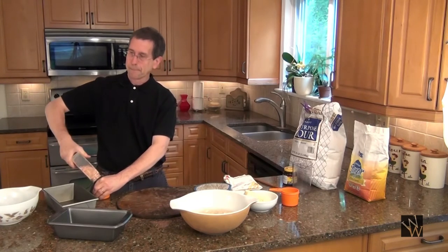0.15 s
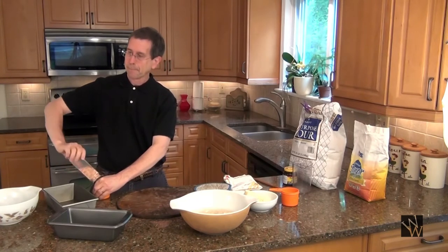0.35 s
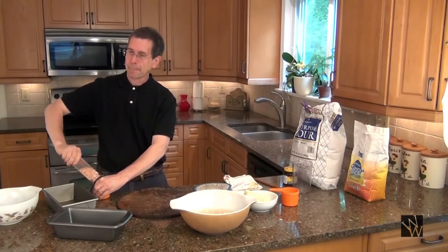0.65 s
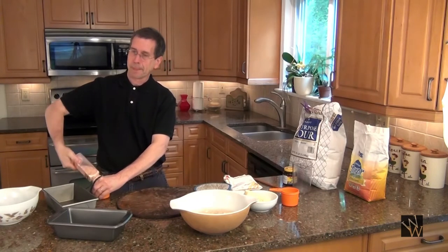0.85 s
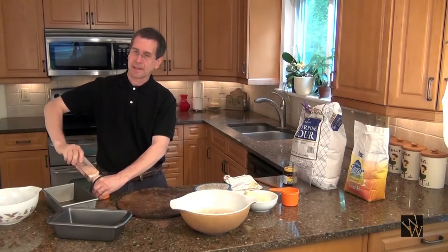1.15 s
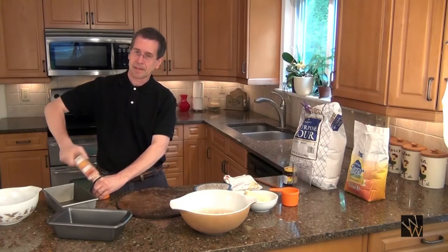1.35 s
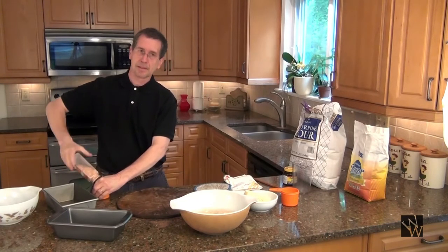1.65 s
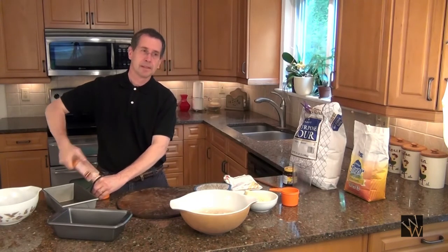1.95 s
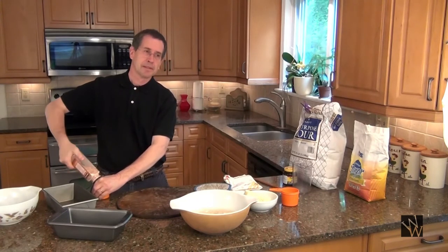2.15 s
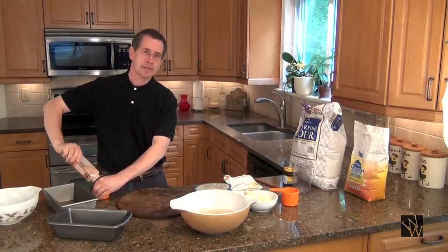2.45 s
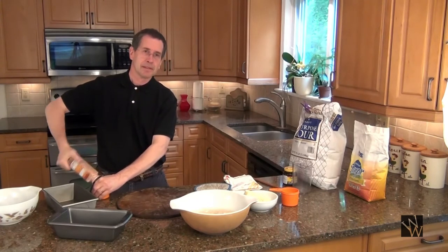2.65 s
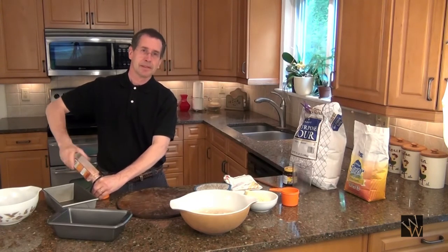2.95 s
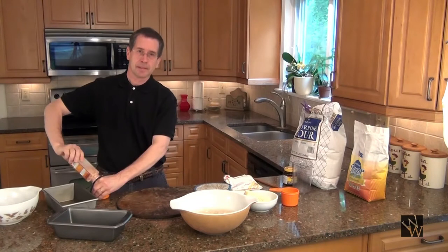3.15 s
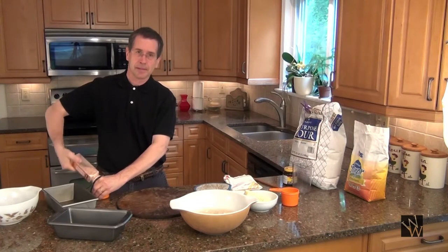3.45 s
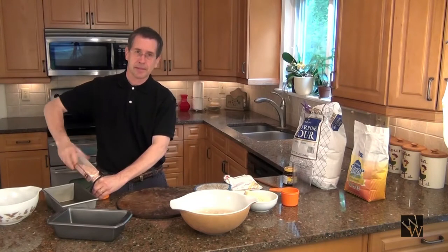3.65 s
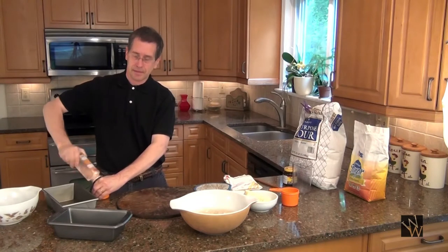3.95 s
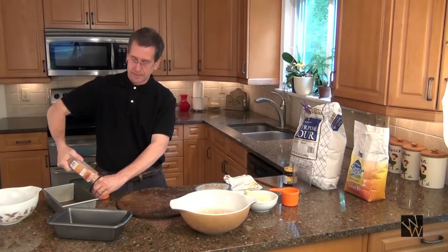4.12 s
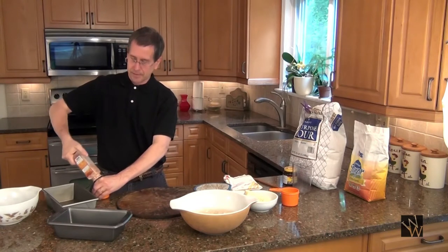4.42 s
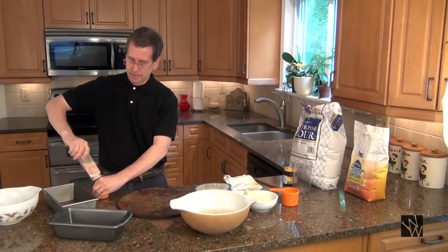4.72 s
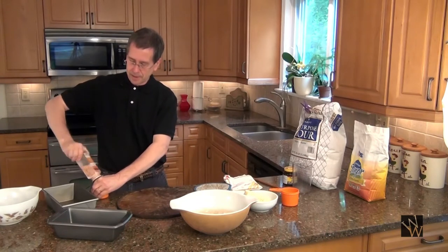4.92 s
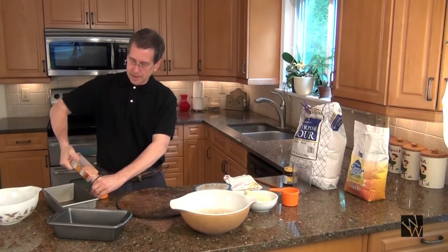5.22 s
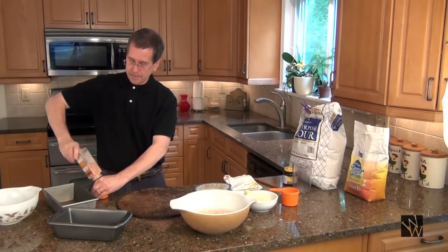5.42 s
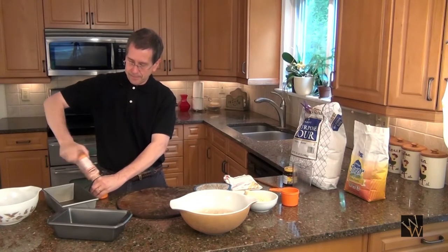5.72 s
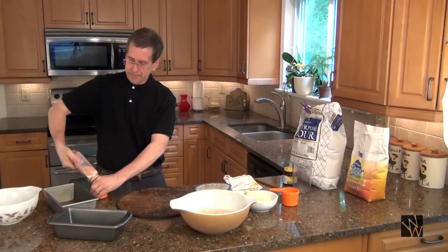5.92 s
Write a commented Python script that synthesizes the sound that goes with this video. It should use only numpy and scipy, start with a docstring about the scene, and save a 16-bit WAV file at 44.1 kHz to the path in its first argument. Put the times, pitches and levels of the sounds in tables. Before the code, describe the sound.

Close in a home kitchen, a hand-held salt mill is twisted in short, separate strokes. Each bites with a crunchy crack, then rasps finer and brighter for about a fifth of a second. Crystals tick and salt sifts in the gaps. Early twists are spaced apart; later ones grow denser and more irregular, with small squeaks, dull hand bumps and faint low rumble.

```python
"""A salt mill is twisted by hand in short rasping strokes: random fractures excite snap, rasp, body and crunch.
Strokes crunch coarsely first, then rasp finer and ring the body; salt sifts throughout.
Single crystals crack as decaying noise clicks, loose grains tick at random, narrow noise bands squeak briefly.
Hands rub as dull noise and bump as short sines; reflections of random sign form a brief kitchen tail.
Low rumble and a steady noise floor lie behind; a peak limiter flattens the loudest moments."""
import sys
import numpy as np
from scipy import signal
from scipy.fft import rfft, irfft
from scipy.io import wavfile
from scipy.ndimage import uniform_filter1d, minimum_filter1d

SR = 44100
rng = np.random.default_rng(int(sys.argv[2]) if len(sys.argv) > 2 else 0)


def log_audio(samples):
    """Write samples as a 16-bit WAV file to the path given in sys.argv[1]."""
    # one column per channel
    frames = np.atleast_2d(samples).T
    # limit to full scale, then quantise
    limited = np.clip(frames, -1, 1)
    pcm = np.round(limited * 32767).astype(np.int16)
    wavfile.write(sys.argv[1], SR, pcm)


N = 268128

# Snap pitch of the crystals: t/s, f/Hz (before random spread)
SNAP_PITCH = [(0, 9900), (.2, 11400), (.55, 11000), (.72, 10450), (1.3, 10000), (1.8, 10660), (3.45, 10550),
              (3.75, 10400), (3.98, 10400), (4.1, 11400), (4.3, 9300), (4.45, 11900), (4.8, 11800),
              (4.92, 10800), (5.45, 10300), (5.78, 10500), (6.08, 10200)]
# Snap colour: f/Hz, relative level/dB
SNAP_COLOUR = [(3000, -14), (6500, -12), (7600, -4.5), (8400, 0.5), (9200, -0.5), (10500, -1.5),
               (11700, -2), (13000, -1.5), (14500, -3), (16000, -12.5)]
# Body resonance colour: f/Hz, relative level/dB
BODY_COLOUR = [(500, -35), (1400, -14.5), (1680, -11), (1930, -3.5), (2150, -7.5), (2380, -11),
               (2800, -15.5), (8000, -39)]
# Rasp colour: f/Hz, relative level/dB
RASP_COLOUR = [(300, -32.5), (900, -14.5), (1500, -4), (2300, -3), (2900, -1.5), (4500, 0), (6300, 1.5),
               (7500, 2), (9000, -10), (11000, -13), (16000, -54)]
# Burr resonances: f/Hz, width/Hz, level over rasp colour/dB
BURR_MODES = [(3570, 830, -7), (4840, 320, -21), (5450, 1200, -8.5)]
# Coarse crunch colour: f/Hz, relative level/dB
CRUNCH_COLOUR = [(40, -38), (120, -4), (300, -6), (480, -3.5), (750, 4.5), (1000, 3), (1350, 2.5),
                 (1900, 0.5), (3500, -5.5), (9000, -26)]


def grinding(snap_db=0.0, rasp_db=0.0, body_db=4.0, crunch_db=2.0, crowding=0.29, sliding=1.0,
             snap_width_hz=2500, snap_spread=0.015, body_width_hz=800, body_spread=0.12, uneven_db=1.52):
    """The same fractures snap, rasp on the burrs, ring the body and, while coarse, crunch."""
    snap, rasp, body, crunch = np.hypot(turning(), sifting())
    # salt packs unevenly: ring and crunch come and go
    body = body * gain_of(uneven_db * wander(samples=900))
    crunch = crunch * gain_of(uneven_db * wander(samples=900))
    # harder turning breaks more crystals per second
    effort = (snap / snap.max()) ** crowding
    force = fractures(per_s=1900 * effort, spread_db=2.0, crumble_s=0.0008)
    coarse = fractures(per_s=280 * effort, spread_db=5.0, crumble_s=0.0062)

    pitch_hz = np.interp(np.arange(N) / SR, *np.transpose(SNAP_PITCH))
    snap_hz = pitch_hz * (1 + snap_spread * wander(samples=70))
    snap_clicks = splinters(force + 0.36 * coarse, patchy_db=-1.7)
    snaps = resonate(ring(snap_clicks, SNAP_COLOUR), snap_hz, snap_width_hz)

    # sliding powder adds an even rub
    rub = force + 0.78 * coarse + sliding * effort
    # body pitch shifts as the salt moves inside
    body_hz = 1980 * (1 + body_spread * wander(samples=500))
    rings = resonate(ring(splinters(rub, patchy_db=4.0), BODY_COLOUR), body_hz, body_width_hz)
    rasps = ring(rasp * splinters(rub, patchy_db=2.2), RASP_COLOUR, BURR_MODES)
    crunch_clicks = splinters(coarse + 0.5 * force, patchy_db=-1.5)
    crunches = ring(crunch * crunch_clicks, CRUNCH_COLOUR)

    out = gain_of(snap_db) * snap * snaps + gain_of(body_db) * body * rings
    return out + gain_of(rasp_db) * rasps + gain_of(crunch_db) * crunches


# Mill twists: start t/s, length/s, time to bite/s, snap level/dB, rasp level/dB, body level/dB,
# coarse crunch level/dB (levels before envelopes and layer gains)
TWIST_STROKES = [(-0.03, 0.034, .01, -18.5, -25, -39, -47), (0.235, 0.026, 0.026, -22.5, -31, -49.5, -48),
                 (0.673, 0.22, 0.037, -15, -24.5, -31, -31), (1.127, 0.02, 0.031, -19.5, -28, -48, -43),
                 (1.247, .025, 0.017, -21, -34.5, -56, -37.5), (1.298, 0.21, 0.005, -14, -22.5, -31, -32),
                 (1.864, 0.22, 0.055, -14, -22.5, -34, -32), (2.264, 0.08, 0.026, -27, -34, -65, -51.5),
                 (2.49, 0.045, 0.015, -27.5, -40.5, -69, -44), (2.568, .21, 0.012, -15, -22, -32.5, -33.5),
                 (3.207, 0.04, 0.027, -13.5, -24.5, -56, -34), (3.269, .225, 0.049, -15, -21, -34, -30.5),
                 (3.728, 0.033, 0.033, -17, -25.5, -48, -40.5), (3.887, 0.015, .005, -26, -39, -53, -38.5),
                 (3.925, 0.092, 0.01, -17.5, -25.5, -36.5, -38.5),
                 (4.014, 0.13, 0.06, -17.5, -19, -32.5, -44.5),
                 (4.523, 0.23, 0.063, -31, -31.5, -51, -45.5), (4.888, 0.13, 0.012, -25, -26.5, -44, -40.5),
                 (4.993, 0.15, 0.0037, -16, -19.5, -28.5, -33), (5.2, 0.017, 0.0088, -28, -29, -35.5, -60),
                 (5.401, 0.12, 0.033, -16, -20.5, -55, -42.5), (5.637, 0.043, 0.016, -17, -23.5, -54, -36),
                 (5.687, 0.21, 0.013, -15, -19, -30, -31.5)]


def turning(snap_fall_db_per_s=230, rasp_fall_db_per_s=190, body_fall_db_per_s=150,
            crunch_fall_db_per_s=210, rasp_growth_db_per_s=32, body_growth_db_per_s=55,
            fining_db_per_s=70, coarse_s=0.067):
    """Gains of snap, rasp, body, crunch: as salt grinds finer, crunch fades while rasp and ring grow."""
    gains = np.zeros((4, N))
    for start, length, bite, snap, rasp, body, crunch in TWIST_STROKES:
        age = np.clip(np.arange(N) / SR - start, 0, length)
        remaining = length - age
        fine_s = np.maximum(age - coarse_s, 0)
        levels_db = [
            snap + twist(start, length, bite, snap_fall_db_per_s),
            rasp + twist(start, length, bite, rasp_fall_db_per_s) - rasp_growth_db_per_s * remaining,
            body + twist(start, length, bite, body_fall_db_per_s) - body_growth_db_per_s * remaining,
            crunch + twist(start, length, bite, crunch_fall_db_per_s) - fining_db_per_s * fine_s]
        now = slice(max(int(start * SR), 0), int((start + length + 0.5) * SR))
        gains[:, now] = np.maximum(gains[:, now], gain_of([level[now] for level in levels_db]))
    return gains


def twist(start, length, bite, fall_db_per_s, bite_db=17, silent_db=-200):
    """Relative level of one twist in dB: swells as the burrs bite, holds, dies when the hand stops."""
    t = np.arange(N) / SR - start
    swell_db = bite_db * np.minimum(t / max(bite, 1e-3) - 1, 0)
    return np.where(t < 0, silent_db, swell_db - fall_db_per_s * np.maximum(t - length, 0))


# Salt sifting between the burrs: t/s, level/dB (before layer gains)
SIFTING_LEVEL = [(0, -47.5), (.35, -51), (.52, -62), (.66, -46), (0.98, -37), (1.11, -45), (1.24, -45),
                 (1.72, -39.5), (1.82, -45.5), (2.2, -39.5), (2.46, -49), (2.92, -43), (3.05, -39),
                 (3.17, -50.5), (3.58, -33.5), (3.7, -44.5), (4.25, -37.5), (4.42, -50.5), (4.65, -32.5),
                 (5.28, -40), (5.38, -52), (5.6, -41.5), (6.08, -53)]


def sifting(snap_db=3.0, rasp_db=-2.0, body_db=-19.0, crunch_db=-15.5):
    """Gains of snap, rasp, body and crunch for salt that only sifts."""
    return gain_of([[snap_db], [rasp_db], [body_db], [crunch_db]]) * follow(SIFTING_LEVEL)[0]


def fractures(per_s, spread_db, crumble_s):
    """Force of crystals giving way at random: many small, few large, each decaying briefly."""
    sizes = gain_of(spread_db * np.minimum(rng.exponential(1, N), 3.5))
    breaks = sizes * (rng.random(N) < per_s / SR)
    # powers add; amplitude decays by 1/e in crumble_s
    return np.sqrt(signal.lfilter([1], [1, -np.exp(-2 / (crumble_s * SR))], breaks ** 2))


def splinters(force, patchy_db):
    """Tiny random clicks under a force of drifting strength, steadied in power."""
    patchy = gain_of(patchy_db * wander(samples=45))
    return steadied(force * patchy * rng.standard_normal(N))


# Single crystal cracks: t/s, tick level/dB, tick f/Hz, rasp level/dB, crunch level/dB
# (rms over 3 ms, before layer gains)
CRYSTAL_CRACKS = [(0.1319, -17, 11600, -49, -58), (0.3017, -23, 11800, -45, -45),
                  (0.381, -27, 11900, -47, -72), (0.4203, -25, 11200, -53, -72),
                  (0.4558, -31, 11500, -54, -72), (0.4657, -27.5, 11600, -53, -72),
                  (0.577, -31.5, 11700, -41, -59), (0.6176, -24.5, 11000, -37, -68),
                  (0.6828, -17, 11000, -26, -41), (0.9765, -24, 10400, -18.5, -50),
                  (1.024, -23, 10500, -22.5, -43), (1.088, -21.5, 10900, -39, -64),
                  (1.1994, -30, 10300, -30, -48), (1.3056, -8, 9900, -20, -34),
                  (1.3177, -18, 10700, -17, -17.5), (1.55, -28, 10500, -12.5, -40),
                  (1.59, -17.5, 10400, -19.5, -49.5), (1.6674, -26, 11400, -26, -57),
                  (1.727, -31, 10800, -40, -41), (1.771, -30, 10800, -31, -38),
                  (1.8383, -19, 10700, -51, -45), (1.8514, -8.5, 10700, -23, -44),
                  (1.883, -21, 10700, -22, -31.5), (2.305, -22, 11600, -30.5, -51),
                  (2.5032, -32, 11000, -42, -62), (2.5792, -7, 10900, -9.5, -14),
                  (2.9014, -27, 10500, -46, -66), (2.9629, -37, 10000, -32, -41),
                  (3.023, -25, 10500, -50, -60), (3.221, -10, 11100, -40, -35),
                  (3.5395, -14, 11100, -7.5, -53), (3.7316, -16, 11660, -40, -46),
                  (3.851, -26, 11600, -48, -51), (3.889, -16.5, 11800, -45, -28),
                  (3.899, -21, 11700, -44, -52), (3.91, -16, 12500, -42, -55),
                  (3.9368, -18, 12000, -27, -28), (4.041, -6, 12500, -29, -39),
                  (4.2767, -14, 11400, -36, -67), (4.3769, -35, 12700, -34.5, -38),
                  (4.4044, -31, 13900, -39, -64), (4.4256, -27, 12800, -43, -63),
                  (4.4348, -23, 12700, -46, -63), (4.4571, -18, 12100, -55, -56),
                  (4.474, -22, 12200, -54, -69), (4.5973, -22, 12200, -18, -61),
                  (4.612, -17, 12900, -27, -43), (4.6515, -16, 12200, -16, -42),
                  (4.6688, -19, 12000, -11.5, -30), (4.6875, -11, 12300, -11.5, -37),
                  (4.7196, -15, 12400, -12.5, -49), (4.7472, -27, 12600, -13, -51),
                  (4.7937, -28, 11800, -19, -54), (4.8107, -17, 12700, -21, -54),
                  (4.816, -25, 12400, -19, -51), (4.8227, -26, 11800, -18, -49),
                  (4.855, -21.5, 11300, -20.5, -58), (4.8872, -16.5, 10000, -12.5, -31),
                  (4.9004, -13, 10100, -8, -24.5), (4.9741, -23, 10500, -8.5, -30),
                  (5.0011, -12.5, 10500, -26.5, -16), (5.2194, -14.5, 10300, -13.5, -44),
                  (5.2796, -15, 11000, -25.5, -41), (5.291, -14.5, 10800, -38, -66),
                  (5.4039, -20.5, 10500, -23, -52), (5.6489, -11, 10500, -31, -28.5)]
# Tick colour: f/Hz, relative level/dB
TICK_COLOUR = [(3000, -14.5), (7000, -10), (9000, 5), (11000, 2.5), (12200, 3.5), (13500, 7), (16000, 2.5)]
# Large crystal bursting, colour: f/Hz, relative level/dB
BURST_COLOUR = [(40, -6), (130, 1), (400, 5), (800, 0), (1150, 7.5), (1600, -17), (2200, -6.5),
                (3200, -4.5), (9000, -35)]


def cracks(tick_db=0.0, rasp_db=-5.5, crunch_db=0.0, split_s=0.00041, crumble_s=0.0024,
           crumble_share=0.6, crush_s=0.0039, width_hz=2500, peak_db=19.0):
    """Crystals split and crumble, ticking at their own pitch and knocking the mill; pieces crush longer."""
    t, out = np.arange(500) / SR, np.zeros(N)
    window = 0.003 * SR
    noises = rng.standard_normal((len(CRYSTAL_CRACKS), len(t)))
    for (s, tick, hz, rasp, crunch), noise in zip(CRYSTAL_CRACKS, noises):
        split, crumble, crush = (noise * np.exp(-t / fade) for fade in (split_s, crumble_s, crush_s))
        parts = (ring(split + crumble_share * crumble, TICK_COLOUR, [(hz, width_hz, peak_db)]),
                 ring(crumble, RASP_COLOUR, BURR_MODES),
                 ring(crush, BURST_COLOUR))
        for part, db in zip(parts, (tick + tick_db, rasp + rasp_db, crunch + crunch_db)):
            add(out, s, gain_of(db) * part * np.sqrt(window / np.sum(part ** 2)))
    return out


def loose_grains(tick_db=-11.5, rasp_db=-17.5, crunch_db=-21.5, ground_db=-3.0):
    """Single grains tick at random: faintly while salt sifts, harder while the burrs turn."""
    drops = evened(fractures(per_s=45, spread_db=4.0, crumble_s=0.00097) * rng.standard_normal(N))
    drops = drops * (follow(SIFTING_LEVEL)[0] + gain_of(ground_db) * turning()[1])
    ticks = gain_of(tick_db) * ring(drops, TICK_COLOUR, [(11300, 5300, 26)])
    rasps = gain_of(rasp_db) * ring(drops, RASP_COLOUR, BURR_MODES)
    return ticks + rasps + gain_of(crunch_db) * ring(drops, BURST_COLOUR)


# Crystals sticking and slipping on the burrs: middle t/s, length/s, f/Hz, width/Hz,
# level/dB (rms before the Hann fade)
STICK_SLIPS = [(0.884, 0.12, 5380, 300, -27), (2.717, 0.053, 4210, 300, -23.5),
               (4.142, 0.16, 5400, 330, -28.5), (4.5, 0.11, 4400, 250, -64), (4.954, .08, 4050, 350, -30),
               (4.987, 0.16, 4630, 450, -24), (5.825, 0.03, 5420, 300, -20), (5.92, 0.03, 3700, 350, -27)]


def squeaks():
    """Uneven slips, as narrowband noise, pump one resonance for a moment."""
    out = np.zeros(N)
    for s, length, hz, width, db in STICK_SLIPS:
        t = np.arange(0, length, 1 / SR)
        lowpass = signal.butter(2, width / 2, fs=SR)
        slips = signal.lfilter(*lowpass, rng.standard_normal((2, SR)))[:, -len(t):]
        tone = evened(((slips[0] + 1j * slips[1]) * np.exp(2j * np.pi * hz * t)).real)
        add(out, s - length / 2, gain_of(db) * np.hanning(len(t)) * tone)
    return out


# Hands rubbing on the mill: t/s, level/dB
RUBBING_LEVEL = [(.1, -71), (.32, -53), (.6, -53.5), (1.15, -50), (1.6, -57), (2.45, -72), (3.1, -52),
                 (4.25, -52), (4.62, -39), (4.79, -61), (4.93, -30), (5.0, -44), (5.35, -56), (6.08, -62)]
# Grip colour: f/Hz, relative level/dB
GRIP_COLOUR = [(30, -15.5), (60, 6), (100, -0.5), (160, -3), (230, -3), (310, 0), (390, -11), (700, -22.5),
               (2000, -23.5)]
# Soft hand bumps: t/s, peak level/dB, f/Hz, length/s
HAND_BUMPS = [(0.495, -32.5, 157, 0.048), (1.682, -39, 263, 0.0087), (2.505, -37, 192, 0.016),
              (3.681, -29, 230, 0.008), (4.385, -37.5, 293, 0.031), (4.914, -24, 308, 0.038),
              (4.952, -29, 320, 0.03)]


def hands(rub_db=0.0, push_db=-4.5):
    """Grip rubs as dull noise, louder at each push; soft bumps are Hann-shaped sines."""
    push = pushing(rise_s=0.0033, ease_db_per_s=130, release_db_per_s=150)
    level = np.hypot(gain_of(rub_db) * follow(RUBBING_LEVEL)[0], gain_of(push_db) * push)
    out = ring(level * rng.standard_normal(N), GRIP_COLOUR)
    for s, db, hz, length in HAND_BUMPS:
        t = np.arange(0, length, 1 / SR)
        add(out, s, gain_of(db) * np.hanning(len(t)) * np.sin(2 * np.pi * hz * t))
    return out


def pushing(rise_s, ease_db_per_s, release_db_per_s):
    """Push of the hands: hardest as a twist breaks into coarse crystals, then easing."""
    t, out = np.arange(SR // 2) / SR, np.zeros(N)
    for start, length, bite, *_, crunch in TWIST_STROKES:
        ease_db = ease_db_per_s * np.maximum(t - bite, 0)
        release_db = release_db_per_s * np.maximum(t - length, 0)
        rise = np.minimum(t / (bite + rise_s), 1)
        add(out, start, rise * gain_of(crunch - ease_db - release_db))
    return out


# Kitchen decay: f/Hz, t60/s
KITCHEN_DECAY = [(250, 0.14), (660, 0.49), (1800, 0.12), (4600, 0.34), (10000, 0.39), (16000, 0.35)]


def kitchen(x, spacing=20):
    """Room tail: sparse reflections of random sign, each band dying at its own speed."""
    taps = np.zeros(SR)
    at = np.arange(200, SR - spacing, spacing)
    taps[at + rng.integers(0, spacing, len(at))] = rng.choice([-1., 1.], len(at))
    hz, t, z = signal.stft(taps, SR, nperseg=256)
    decay = gain_of(-60 * t / read(KITCHEN_DECAY, hz)[:, None])
    tail = signal.istft(z * decay, SR, nperseg=256)[1]
    return signal.fftconvolve(x, tail / np.linalg.norm(tail))[:N]


# Low rumble swells: middle t/s, level/dB (before swell gain)
RUMBLE_SWELLS = [(.37, -35.5), (1.2, -38), (2.388, -41), (3.8, -53), (4.0, -31.5), (4.31, -36), (4.94, -32)]
# Room floor colour: f/Hz, relative level/dB
FLOOR_COLOUR = [(10, -13), (25, -2), (37, -1.5), (55, -11), (90, -15), (200, -28), (400, -54), (1000, -34),
                (4000, -39), (16000, -35)]


def background(rest_db=-58.5, push_db=-7.5, swell_db=-1.5, swell_s=0.18, floor_db=-47):
    """Low rumble noise rises with each push and swells now and then, over a steady noise floor."""
    push = pushing(rise_s=0.02, ease_db_per_s=43, release_db_per_s=200)
    level = gain_of(rest_db) + gain_of(push_db) * push
    for s, db in RUMBLE_SWELLS:
        add(level, s - swell_s / 2, gain_of(db + swell_db) * np.hanning(int(swell_s * SR)))
    # f/Hz, relative level/dB
    rumble_colour = [(8, -42), (24, 4.0), (37, 20.5), (52, -9), (80, -13), (200, -63), (1000, -90)]
    return level * wash(rumble_colour) + gain_of(floor_db) * wash(FLOOR_COLOUR)


def wash(colour):
    """Steady noise of a given colour, rms 1."""
    spectrum = rfft(rng.standard_normal(N))
    return evened(irfft(spectrum * gain_of(read(colour, np.fft.rfftfreq(N, 1 / SR))), N))


def ring(x, colour, modes=(), size=4096):
    """Causal minimum-phase filter of unit energy: a broad colour with resonances standing on it."""
    hz = abs(np.fft.fftfreq(size, 1 / SR))
    peaks = sum(gain_of(db) / (1 + (2 * (hz - f) / width) ** 2) for f, width, db in modes)
    log_gain = np.log(gain_of(read(colour, hz)) * (1 + peaks))
    response = np.fft.ifft(np.exp(np.conj(signal.hilbert(log_gain)))).real[:size // 2]
    return signal.oaconvolve(x, response / np.linalg.norm(response))[:N]


def resonate(x, hz, width_hz):
    """A resonance that follows the curve hz; the result has rms 1."""
    turn = np.exp(2j * np.pi * np.cumsum(hz) / SR)
    r = np.exp(-np.pi * width_hz / SR)
    return evened((turn * signal.lfilter([1 - r], [1, -r], x / turn)).real)


def wander(samples):
    """Random drift of rms 1: noise averaged twice over a sample window."""
    return evened(uniform_filter1d(uniform_filter1d(rng.standard_normal(N), samples), samples))


def steadied(x, samples=700):
    """Holds the power of a click train near 1, leaving its grain."""
    return x / np.sqrt(abs(uniform_filter1d(x ** 2, samples)) + 1e-6)


def evened(x):
    """Scales to rms 1."""
    return x / np.sqrt(np.mean(x ** 2) + 1e-20)


def gain_of(db):
    """Decibels to an amplitude factor."""
    return 10 ** (np.asarray(db) / 20)


def read(points, hz):
    """Reads a table on a log-frequency axis."""
    f, value = np.transpose(points)
    return np.interp(np.log(hz + 1), np.log(f + 1), value)


def follow(rows):
    """Each dB column of a curve as a gain for every sample."""
    s, *columns = np.transpose(rows)
    return [gain_of(np.interp(np.arange(N) / SR, s, c)) for c in columns]


def add(mix, s, sound):
    """Mixes a sound in at time s, or at 0 if s is negative."""
    part = mix[max(round(s * SR), 0):][:len(sound)]
    part += sound[:len(part)]


def scene(room_db=-7.0, count=6, changes_per_s=24):
    """Mill and hands in the kitchen; each break radiates its own way, so the reflections keep changing."""
    mill = grinding() + cracks() + loose_grains() + squeaks() + hands()
    # crossfade cyclically through several random tails
    place = np.arange(N) / SR * changes_per_s
    room = np.zeros(N)
    for k in range(count):
        distance = np.minimum(abs((place - k + 1) % count - 1), 1)
        room += kitchen(mill * np.cos(np.pi / 2 * distance))
    return (mill + gain_of(room_db) * room + background())[None]


def record(dry, ceiling_db=-1.8, recovery_db_per_s=610.0, edge_hz=16030):
    """Fast look-ahead peak limiter with linear dB recovery, then a lowpass band limit."""
    over_db = np.maximum(20 * np.log10(abs(dry[0]) + 1e-9) - ceiling_db, 0)
    fall_db = np.arange(N) * recovery_db_per_s / SR
    held_db = np.maximum.accumulate(over_db + fall_db) - fall_db
    limited = dry * gain_of(uniform_filter1d(minimum_filter1d(-held_db, size=21), size=21))
    lowpass = signal.firwin(511, edge_hz, window=("kaiser", 9), fs=SR)
    return signal.oaconvolve(limited, lowpass[None], "same")


dry = scene()
out = record(dry)
log_audio(out)
```